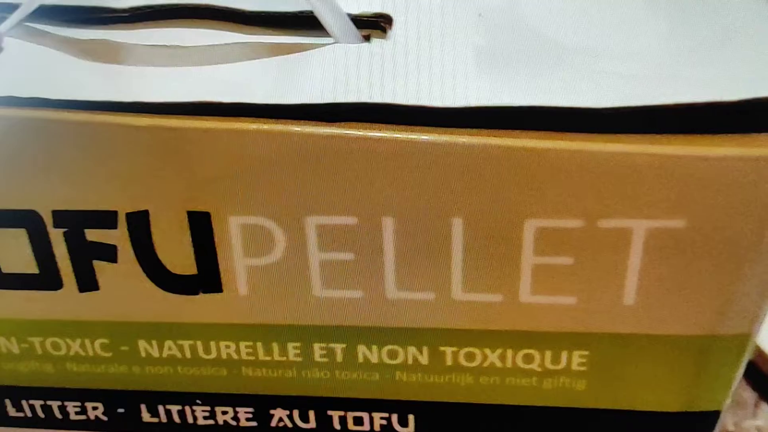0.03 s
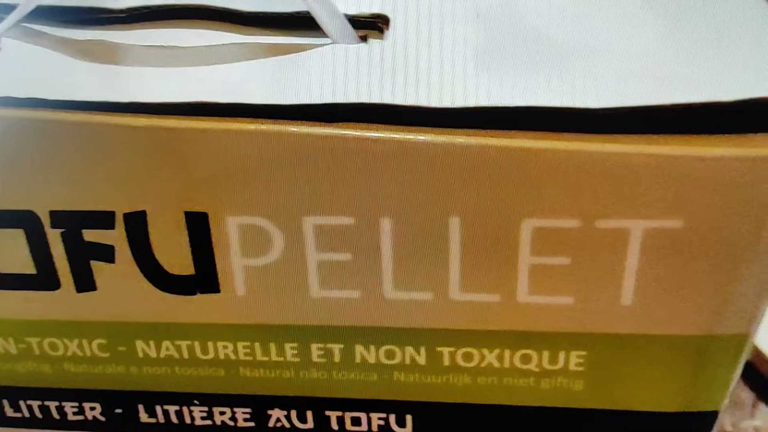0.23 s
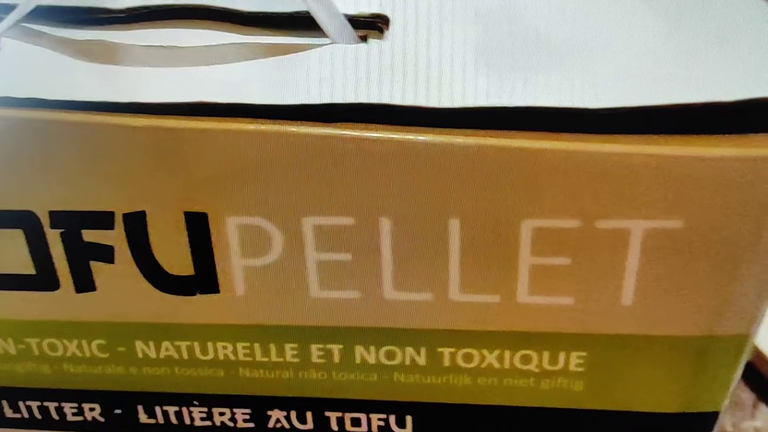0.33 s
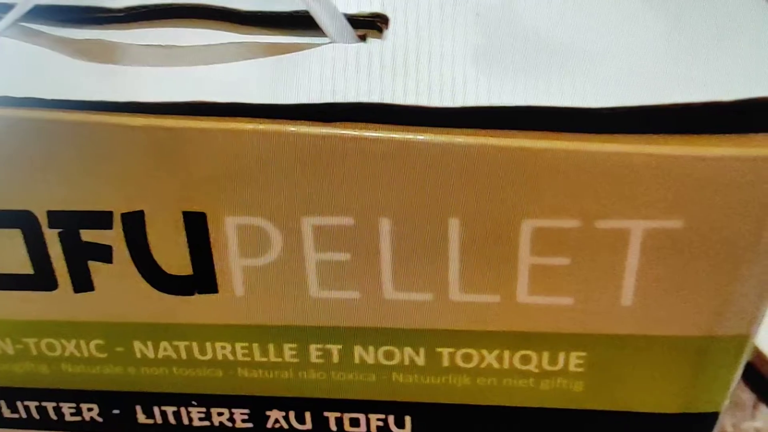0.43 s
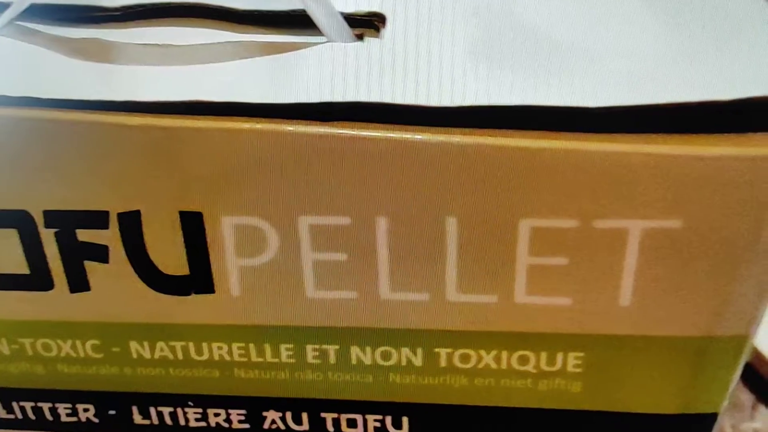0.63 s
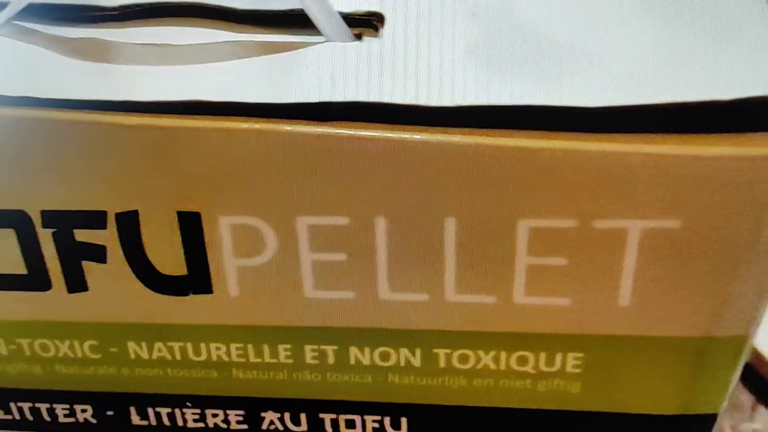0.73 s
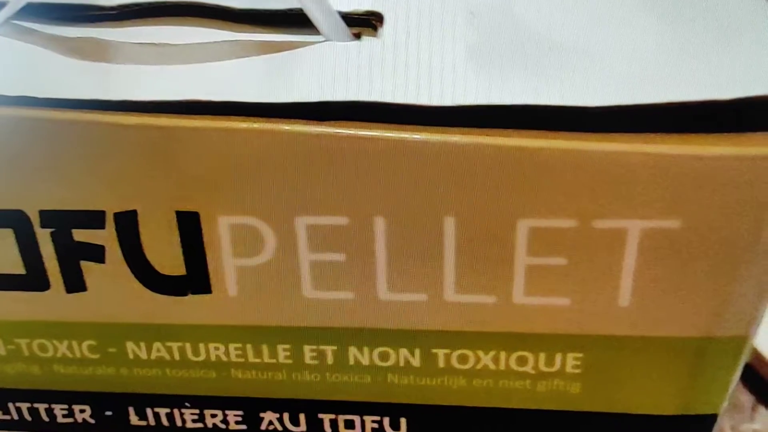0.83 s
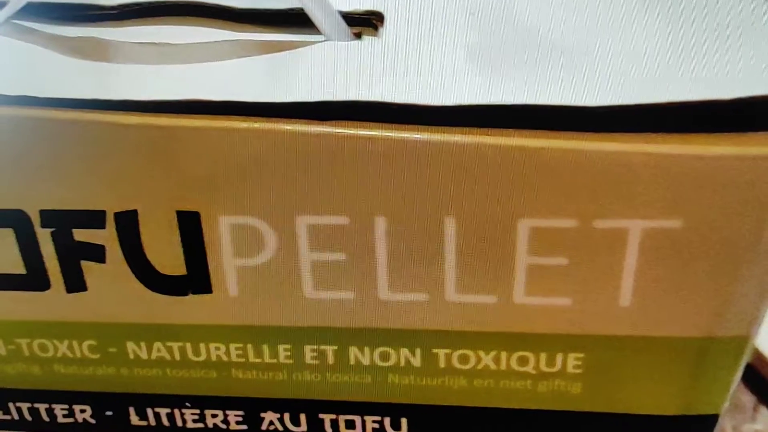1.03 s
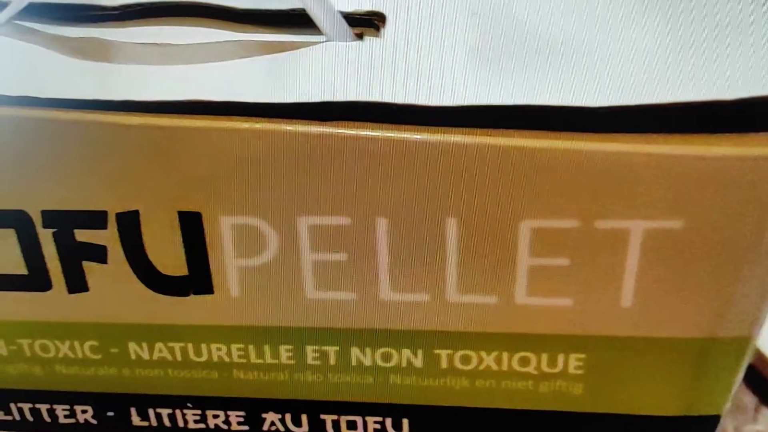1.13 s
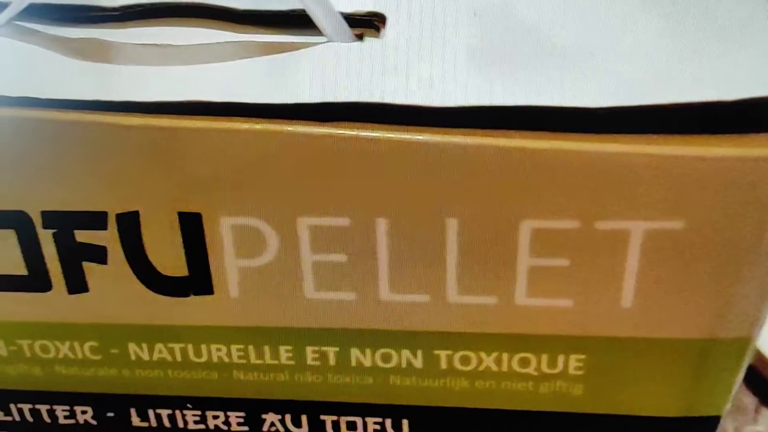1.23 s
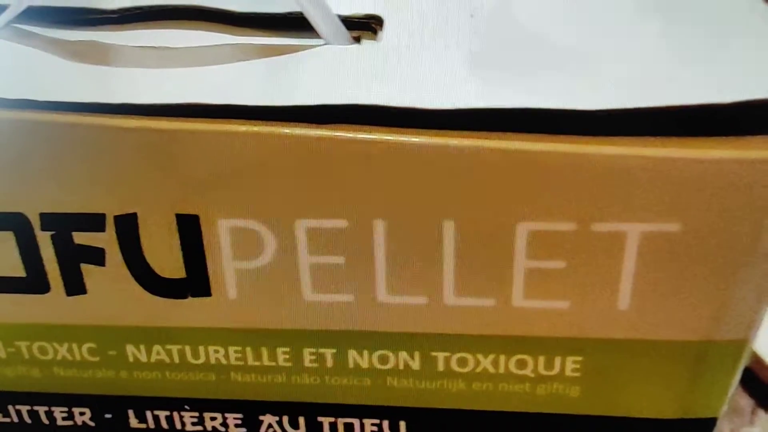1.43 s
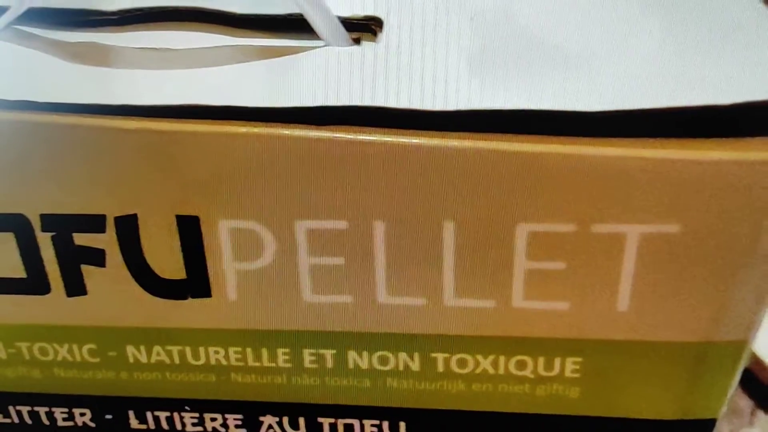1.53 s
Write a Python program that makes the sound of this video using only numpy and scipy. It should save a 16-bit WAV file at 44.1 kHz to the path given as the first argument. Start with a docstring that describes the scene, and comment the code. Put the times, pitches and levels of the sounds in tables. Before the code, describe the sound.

A quiet, low room hum with rumble and thin hiss fades in at about 0.1 seconds and wavers to the end. A soft, dull bump on the phone comes at 0.15 seconds, followed by three tiny ticks between 0.2 and 0.35. Very faint, brief rustles from a nearby plastic bag come around 0.5, 0.9 and 1.25 seconds, with slightly clearer ones just after 1.5.

```python
"""A phone starts listening in a quiet room, held close to a bag of pellets. Its input fades in on a low,
wavering hum, room rumble and microphone hiss. The hand nudges the phone, exciting a soft, damped bump.
The input's offset then swells and settles, dropping in three small steps, each heard as a tick.
As the hum goes on, light handling gives brief friction rustles, which ring the two microphone ports."""
import sys
import numpy as np
from scipy import signal
from scipy.fft import rfft, irfft
from scipy.io import wavfile

SR = 44100
rng = np.random.default_rng(int(sys.argv[2]) if len(sys.argv) > 2 else 0)


def persist_wave(psi):
    """Save psi, clipped to +-1, as 16-bit WAV."""
    counts = np.round(np.clip(psi, -1, 1) * 32767).astype(np.int16)
    wavfile.write(sys.argv[1], SR, np.atleast_2d(counts).T)


N = 70560

# downward steps of the input's offset: time_s, size_db, edge_s
OFFSET_STEPS = [(0.2258, -50.5, 0.000011), (0.2651, -46.5, 0.0000061), (0.3262, -49, 0.000026)]
# fade-in of the input: time_s, gain_db
INPUT_FADE = [(0.102, -43.5), (0.11, -24.5), (0.138, -9), (.2, -8), (0.262, -3), (.31, 0), (.45, -0.5),
              (1.6, 0)]
# room resonances in the hum: centre_hz, width_hz, level_db
ROOM_MODES = [(235.8, 11, -71.5), (275.5, 18, -68.5), (429.7, 14, -80.5)]
# their common swell: time_s, gain_db
MODE_SWELL = [(.2, 1), (.31, 2.5), (.72, 1), (.92, -0.5), (1.01, 3.5), (1.28, 3), (1.402, 8), (1.47, 1),
              (1.54, 11), (1.6, -7)]
# deepest tones of the hum: pitch_hz, level_db
DRONE_TONES = [(44, -60.5), (76, -66)]
# their common swell: time_s, gain_db
DRONE_SWELL = [(.14, -7.5), (.25, 6), (.32, -4), (.52, -0.5), (.66, -9.5), (.76, -1), (.9, -7), (1.164, 4),
               (1.282, -1.5), (1.42, -4), (1.53, 3), (1.6, -0.5)]
# envelope of the strongest hum tone: time_s, level_db
TONE_SWELL = [(.2, -73), (.33, -66), (.53, -68.5), (.73, -61), (.83, -66), (0.928, -55.5), (1.11, -77),
              (1.258, -62), (1.39, -69.5), (1.55, -59)]
# envelope of the faint whine: time_s, level_db
WHINE_SWELL = [(.24, -87), (.34, -70.5), (.45, -84.5), (.62, -75), (.72, -83.5), (.82, -82.5), (1.1, -86),
               (1.31, -78.5), (1.5, -89)]
# modes of the nudged phone: pitch_hz, decay_s, gain_db
PHONE_MODES = [(76, 0.03, -9), (170, 0.021, -6.5), (500, 0.0012, -3.5), (980, 0.0006, -7.5)]
# slides on plastic: start_s, length_s, level_db, left_minus_right_db, centre_hz, width_hz
SLIDES = [(0.159, 0.014, -75.5, 0, 2200, 2500), (0.297, 0.42, -90.5, 8, 4480, 8900),
          (0.46, 0.0058, -74, 3, 4420, 7060), (0.49, .016, -79.5, 0, 7000, 4500),
          (0.896, 0.055, -82.5, 5, 7800, 3500), (.918, .036, -83.5, 8.5, 8720, 600),
          (1.24, 0.068, -83, 0, 7750, 4000), (1.524, 0.03, -75.5, -1.5, 7700, 3940),
          (1.554, 0.038, -73.5, 0.5, 6600, 4700), (1.566, 0.063, -85, 0, 7460, 3580)]
# microphone ports, left then right: centre_hz, width_hz, lift_db, sensitivity_db
MIC_PORTS = [(8500, 840, 13.5, 0), (7360, 790, 11.5, 4.5)]
# spectrum of the room air: frequency_hz, relative_density_db
AIR_SPECTRUM = [(20, 5.5), (55, -7), (100, -3), (150, -0.5), (200, 3.5), (285, -3.5), (335, -7.5),
                (480, -12), (760, -16.5), (900, -22), (1400, -28), (2500, -31), (4000, -37.5), (9000, -49)]
# spectrum of the microphone hiss: frequency_hz, relative_density_db
HISS_SPECTRUM = [(300, 8.5), (2200, 4), (3500, -0.5), (6000, -0.5), (8900, -4.5), (9700, -9), (12500, -7.5)]


def input_offset(t):
    """Settling transient: the offset rises and relaxes; each abrupt step is broadband, hence a tick."""
    start_s, rise_s, step_decay_s = 0.16, 0.15, 0.039
    age = np.maximum(t - start_s, 0) / rise_s
    hump = (age * np.exp(1 - age)) ** 1.44 * undb(-33.5)
    drops = 0
    for time_s, size_db, edge_s in OFFSET_STEPS:
        step = (1 + np.tanh((t - time_s) / edge_s)) / 2
        drops += undb(size_db) * step * np.exp(-np.abs(t - time_s) / step_decay_s)
    return hump * pan(left_db=5.5) - drops * pan(left_db=4.5)


def hum(t):
    """Superposition: a distant appliance's wavering tones add to narrow room resonances."""
    modes, stereo_spread = 0, 0.076
    for centre_hz, width_hz, level_db in ROOM_MODES:
        mid, side = (noise_band(centre_hz, 1.41 * width_hz) for _ in range(2))
        modes += undb(level_db) * (mid + stereo_spread * np.array([side, -side]))
    drone = sum(undb(db) * tone(hz) for hz, db in DRONE_TONES) * swell(t, DRONE_SWELL)
    strongest = tone(pitch_hz=172.3) * swell(t, TONE_SWELL)
    whine = noise_band(centre_hz=697.7, width_hz=20.7) * swell(t, WHINE_SWELL)
    sustained = tone(pitch_hz=132.3) * undb(-65.5 + 2.5 * wander(rate_hz=3.2))
    return (modes * swell(t, MODE_SWELL) + drone + strongest + whine + sustained) * pan(left_db=3.5)


def hand_bump(t, start_s=0.1445):
    """Impulse response: nudged by the hand, the phone rings dully in exponentially damped modes."""
    age = np.maximum(t - start_s, 0)
    ring = 0
    for pitch_hz, decay_s, gain_db in PHONE_MODES:
        ring += undb(gain_db) * np.exp(-age / decay_s) * np.sin(2 * np.pi * pitch_hz * age)
    return -ring * undb(-57) * pan(left_db=17)


def rustles(t):
    """Friction noise: each grainy slide on plastic fills its own band; the narrowest nearly squeaks."""
    attack_fraction, grain_db = 0.28, 1.5
    slides = 0
    for start_s, length_s, level_db, left_db, centre_hz, width_hz in SLIDES:
        power = np.interp((t - start_s) / length_s, [0, attack_fraction, 1], [0, 1, 0])
        friction = np.array([noise_band(centre_hz, width_hz) for _ in range(2)])
        slides += friction * np.sqrt(power) * undb(level_db) * pan(left_db)
    grain = unit(undb(grain_db * wander(rate_hz=480)))
    return slides * grain


def ports(sound):
    """Acoustic resonance: each microphone port lifts its own band of treble."""
    gains = [undb(sensitivity_db) * (1 + (undb(lift_db) - 1) * resonance(centre_hz, width_hz))
             for centre_hz, width_hz, lift_db, sensitivity_db in MIC_PORTS]
    return irfft(rfft(sound) * np.array(gains), N)


def room_air(corner_hz=478):
    """Diffuse field: the rumble is coherent at the two microphones in the bass, unrelated higher up."""
    coherence = 0.8 / (1 + (freqs() / corner_hz) ** 3)
    mid, side = (rfft(rng.standard_normal(N)) * colour(AIR_SPECTRUM) * np.sqrt(1 + sign * coherence)
                 for sign in (1, -1))
    rumble = irfft(np.array([mid + side, mid - side]), N)
    return unit(rumble) * undb(-58.5) * pan(left_db=4.5)


def hiss():
    """Self-noise: each microphone adds its own independent, smooth hiss."""
    return undb(-77.5) * np.array([noise(colour(HISS_SPECTRUM)) for _ in range(2)])


def tone(pitch_hz, drift_hz=1.5):
    """Frequency modulation: a sine of rms 1 whose phase integrates a drifting pitch."""
    cycles = rng.random() + np.cumsum(pitch_hz + drift_hz * wander(rate_hz=6.2)) / SR
    return np.sqrt(2) * np.sin(2 * np.pi * cycles)


def resonance(centre_hz, width_hz):
    """Response of a damped resonator, 1 at its centre."""
    f = freqs()
    return 1 / (1 + 1j * (f / centre_hz - centre_hz / f) * centre_hz / width_hz)


def noise_band(centre_hz, width_hz):
    """Noise through two like resonators in cascade, at rms 1."""
    return noise(resonance(centre_hz, width_hz) ** 2)


def wander(rate_hz):
    """Random fluctuation: low-passed noise of rms 1."""
    return noise(1 / (1 + (freqs() / rate_hz) ** 4))


def noise(gain):
    """Spectral shaping: white noise weighted per bin, at rms 1."""
    return unit(irfft(rfft(rng.standard_normal(N)) * gain, N))


def colour(points):
    """Spectral envelope: gain per bin from (frequency_hz, gain_db) points."""
    hz, db = np.array(points).T
    return undb(np.interp(np.log(freqs()), np.log(hz), db))


def swell(t, points):
    """Amplitude envelope from (time_s, gain_db) points."""
    time_s, db = np.array(points).T
    return undb(np.interp(t, time_s, db))


def freqs():
    """Frequency of every spectral bin, at least 1 Hz."""
    return np.maximum(np.fft.rfftfreq(N, 1 / SR), 1)


def pan(left_db):
    """Level difference: two channel gains, left_db apart."""
    return undb(np.array([[left_db], [-left_db]]) / 2)


def unit(x):
    """Normalisation to rms 1."""
    return x / np.sqrt(np.mean(x ** 2))


def undb(db):
    """Decibels to amplitude ratio."""
    return 10 ** (np.asarray(db) / 20)


def scene():
    """Linear mixing: room, hiss and rustles fade in; the bump and the offset add at full strength."""
    t = np.arange(N) / SR
    fade = swell(t, INPUT_FADE) * (t > INPUT_FADE[0][0])
    return fade * (hum(t) + room_air() + ports(hiss() + rustles(t))) + hand_bump(t) + input_offset(t)


def record(dry):
    """Band limiting: the phone dulls the high treble with a shelf, then cuts the top with a low-pass."""
    shelf_from_hz, shelf_to_hz, shelf_db, cutoff_hz = 8900, 9700, -3, 12700
    gains = undb([0, 0, shelf_db, shelf_db])
    shelf = signal.firwin2(63, [0, shelf_from_hz, shelf_to_hz, SR / 2], gains, fs=SR)
    dulled = np.array([np.convolve(np.pad(channel, 31, "edge"), shelf, "valid") for channel in dry])
    low_pass = signal.ellip(8, 0.2, 70, cutoff_hz, fs=SR, output="sos")
    return signal.sosfilt(low_pass, dulled)


dry = scene()
out = record(dry)
persist_wave(out)
```